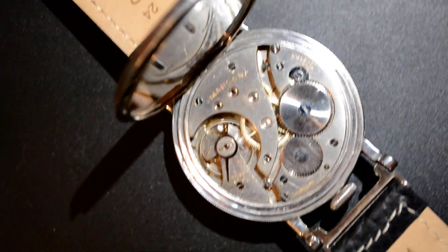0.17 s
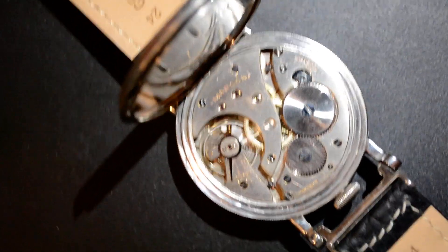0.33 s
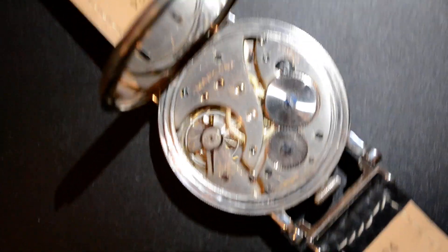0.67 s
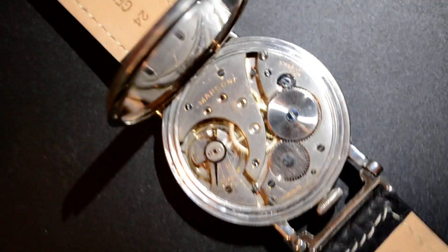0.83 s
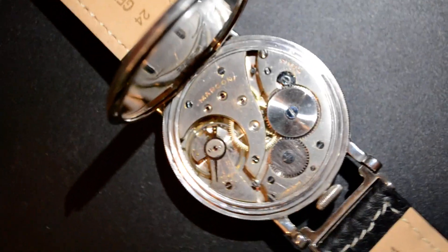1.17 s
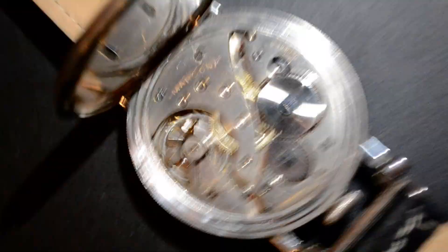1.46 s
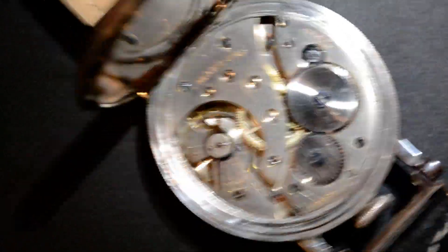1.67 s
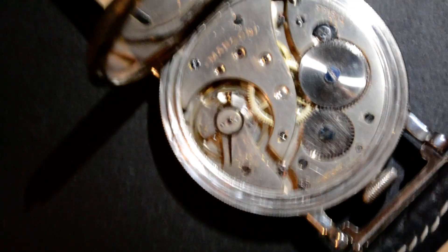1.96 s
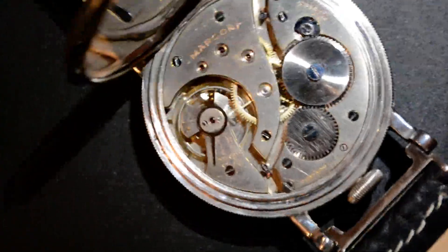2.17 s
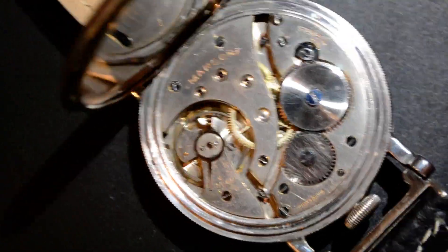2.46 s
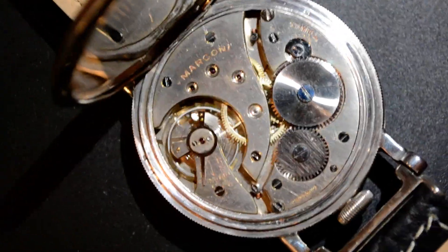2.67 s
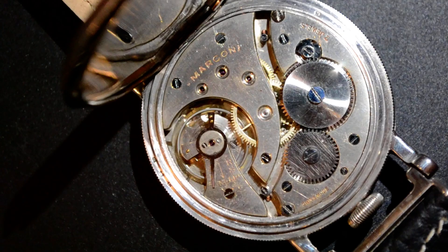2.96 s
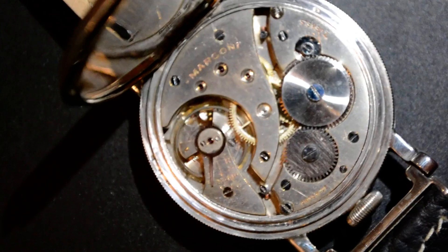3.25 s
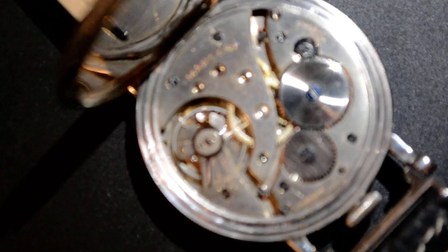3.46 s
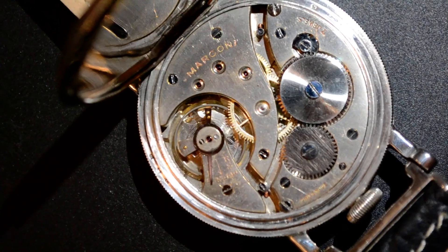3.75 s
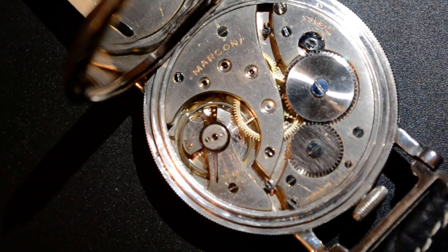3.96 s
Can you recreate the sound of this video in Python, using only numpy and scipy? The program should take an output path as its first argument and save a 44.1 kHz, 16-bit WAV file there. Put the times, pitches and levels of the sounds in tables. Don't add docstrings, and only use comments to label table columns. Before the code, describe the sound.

Quiet room, low hiss. A small open watch movement ticks five times a second, thin and distant. Right at the microphone, a camera's plastic body creaks and taps under fingers, a button clicks sharply, then the zoom barrel rubs briefly and smacks its stop, the loudest moment. Small knocks follow; later a softer click starts four short whirring, squeaky focus motor runs.

```python
import sys
import numpy as np
from scipy import signal
from scipy.fft import rfft, irfft, next_fast_len
from scipy.io import wavfile

SR = 44100
rng = np.random.default_rng(int(sys.argv[2]) if len(sys.argv) > 2 else 0)


def unload_wav(signal):
    wavfile.write(
        sys.argv[1],
        SR,
        np.round(np.clip(np.atleast_2d(signal).T, -1, 1) * 32767).astype(np.int16),
    )


def gain_from_decibels(decibels):
    exponent = np.asarray(decibels, float) / 20
    return 10 ** exponent


N = 180829

# (time [s], level [dB], lens cavity hum [dB])
NOISE_LEVELS = [(0, -64.5, -19), (.3, -66.5, -12), (.95, -65, -7), (1.3, -65.5, -17), (1.55, -60, -12),
                (1.75, -65, -7.5), (2.5, -66, -11), (3.0, -66, -15), (3.5, -65, -11), (4.1, -66.5, -7.5)]
# (frequency [Hz], density [dB per Hz])
NOISE_COLOUR = [(15, -57), (25, -17), (122, -11.5), (171, -0.5), (238, -3.5), (359, -3.5), (775, -4.5),
                (1330, -4.5), (1900, -10), (3010, -7.5), (3340, -13), (4310, -15), (4780, -18.5),
                (9540, -28), (11400, -32), (14800, -72), (22000, -120)]
# (frequency [Hz], width [Hz], level [dB])
NOISE_PEAKS = [(100.2, 16, -25.5), (188, 37, -20), (341, 38, -12.5), (1300, 130, -22), (3610, 49, -17),
               (4300, 140, -17), (5130, 31, -22.5)]
# (frequency [Hz], opens [s], shuts [s])
LENS_CAVITIES = [
    (3150, 0.0, .7),
    (2670, .45, 1.54),
    (2960, 1.54, 4.2),
]
# (frequency [Hz], level [dB rms])
APPLIANCE_LINES = [(100, -88), (174, -82.5), (199, -81)]
# (frequency [Hz], level [dB], t60 [s])
WATCH_PLATES = [(6100, -3, 0.015), (6630, 1, 0.011), (7050, 0.5, 0.017), (8500, -9, 0.014),
                (9000, -7, .012), (9700, -6, .02), (10960, -7, .009)]
WHEEL_DROPS = [-53, -52.5, -57, -50, -52, -56, -53.5, -55, -54, -59, -59, -53.5, -52.5, -54.5, -55, -59,
               -56, -56, -56, -56, -57.5]
# (time [s], peak [dB], thud under it [dB], sharp edge over it [dB], panel ring [Hz])
BODY_KNOCKS = [(0.2124, -60, -16, -7, 970), (.7165, -64, 2.5, -9, 850), (0.7312, -42.5, -29, -6.5, 3320),
               (0.8046, -59, 3, -14, 458), (0.8664, -60, -1.5, -16, 1280), (0.8879, -45.5, -6, -18.5, 2670),
               (0.9004, -43, -12.5, -21, 2520), (0.9083, -38, -11, -14, 2750), (1.3324, -50, 3, -22, 330),
               (1.3399, -37.5, -3.5, -27, 970), (1.3454, -42, -1.5, -27, 450), (1.503, -47, .1, -18, 473),
               (1.592, -49, -3.5, -21, 3200), (1.655, -54, -11, -18, 3300), (1.6854, -61, 7, -17, 1300),
               (1.7844, -55, -22, -14, 2890), (1.304, -70, 9, -11, 820), (1.869, -52, -9, -6, 3300),
               (1.8751, -40, -11, -9, 3300), (1.883, -52, -2.5, -18, 546), (2.0118, -54, -13.5, -22, 3050),
               (2.0428, -52.5, -6, -11.5, 689), (2.1044, -55, -8.5, -30, 396), (2.4734, -66, 4, -11, 630)]
FOCUS_REVERSALS = [
    (3.2237, -45, -10, -18, 4500),
    (3.5576, -37.5, -11, -21, 2570),
    (3.5653, -33.5, -11, -27, 2650),
]
# (time [s], peak [dB], sharp edge over it [dB], ring [Hz])
GEAR_SLACK = [(3.0508, -54.5, -4, 4000), (3.0572, -44, -19, 5070), (3.0628, -35, -13, 4970),
              (3.1773, -41, -16, 4440), (3.2148, -50, 2.5, 4860), (3.2293, -35, -5.5, 5180),
              (3.455, -36.5, -23, 2580), (3.5167, -38.5, -12.5, 4950), (3.5311, -40, -26, 2770),
              (3.5384, -45, -21, 4450), (3.6401, -53, -11, 4950), (3.6872, -35.5, -21, 4480),
              (3.7556, -48, -2.5, 4960), (3.7645, -40, -16, 3750), (3.7698, -32.5, -15, 4700),
              (3.8441, -41, -13, 4300)]
# (time [s], peak [dB])
LEVER_CLICKS = [
    (1.2085, -23.5),
    (2.9228, -34),
]
# (frequency [Hz], level [dB], t60 [s])
SHELL_MODES = [
    [(748, -12, 0.022), (1016, -14, 0.018), (1290, -4, 0.022), (1640, -17, 0.014), (1890, -21, 0.025),
     (2720, -3.5, 0.018), (2860, -3.5, 0.016), (4320, -17, 0.015), (5200, -19, .01), (6140, -14, 0.0063),
     (7200, -17, .007), (8700, -13, .005), (9500, -13.5, .005)],
    [(910, -15.5, 0.031), (1330, 1.5, 0.016), (1410, -10, 0.11), (1700, -3, 0.014), (2200, -3.5, 0.016),
     (2800, -13, .02), (3640, -15, 0.012), (4500, -14, 0.021), (5000, -11, 0.01), (7000, -24, .008)],
]
CLICK_CRACK = (.18, .12)
# (frequency [Hz], density [dB per Hz])
RUB_COLOUR = [(88, -53), (150, -30), (339, -10), (584, -18), (781, -11), (2000, -9), (2780, -4.5),
              (3520, -14), (5140, -15), (9190, -21), (11400, -38), (14800, -70), (22000, -120)]
# (frequency [Hz], width [Hz], level [dB])
RUB_PEAKS = [(1280, 300, -20), (2780, 200, -.3), (5130, 250, -15), (8400, 340, -14)]
# (time [s], peak [dB], contact hardness [Hz])
BARREL_HITS = [
    (1.5436, -16, 9000),
    (1.5437, -12, 8000),
    (1.5464, -13, 3000),
    (1.5527, -26, 2500),
]
# (frequency [Hz], level [dB], t60 [s])
BARREL_MODES = [(190, -14, 0.02), (256, -6, .025), (320, .7, 0.024), (433, -.5, 0.028), (507, -15, .02),
                (748, -3, 0.026), (967, -12.5, 0.039), (1120, -18, 0.035), (1264, -1.5, 0.055),
                (1500, -6.5, 0.02), (1880, -.3, 0.02), (2460, -5.5, 0.03), (2850, 6, 0.032),
                (3500, -8.5, 0.027), (4380, 3, 0.0095), (5290, -6.5, 0.018), (9440, -2, .01)]
# (time [s], level [dB], whine centre [Hz], gear mesh [Hz])
FOCUS_RUNS = [
    [(3.052, -68, 4700, 1500), (3.062, -52, 4940, 1500), (3.085, -49, 4500, 1450), (3.11, -49, 4050, 1030),
     (3.13, -50.5, 4870, 950), (3.18, -53.5, 4830, 960)],
    [(3.215, -45, 4940, 1300), (3.25, -45.5, 4630, 1410), (3.28, -51.5, 4300, 1540),
     (3.312, -52, 4380, 1890), (3.34, -50.5, 3970, 1390), (3.37, -49.5, 3900, 1210),
     (3.457, -50, 4070, 1290)],
    [(3.518, -52, 4900, 1300), (3.54, -47.5, 4640, 1330), (3.562, -56, 3700, 1300),
     (3.59, -49.5, 3900, 1420), (3.62, -48, 4700, 1420), (3.65, -54, 5200, 1460), (3.689, -52, 4900, 1450)],
    [(3.756, -49.5, 4830, 1300), (3.772, -43, 4300, 1334), (3.785, -52.5, 4950, 1320),
     (3.82, -52.5, 4770, 1400), (3.846, -50, 4500, 1400)],
]
# (frequency [Hz], density [dB per Hz])
MOTOR_SPECTRUM = [(290, -45), (500, -18), (855, -11), (1300, -13), (2060, -10.5), (2500, -6), (3170, -7),
                  (3800, 1), (6250, -14), (9890, -19.5), (11400, -54), (14800, -82), (22000, -120)]
# (frequency [Hz], width [Hz], level [dB])
HOUSING_PEAKS = [(1290, 140, -14), (4480, 230, 6.5), (4950, 68, -5), (5460, 340, -2.5), (5700, 100, -20),
                 (7760, 280, -28), (6790, 78, -20), (8450, 200, -17), (10000, 160, -32)]
# (ratio to whine centre, width [Hz], level [dB])
WHINES = [(.98, 350, 2.1), (1.12, 380, -1.5)]
# (multiple of mesh rate, level [dB])
MESH_SQUEAL = [(1, -10), (2, 1), (3, -4.5), (4, -35)]

FIRST_BEAT_S, BEAT_S, TOCK_EARLY_S = .0427, .2, .0051
PALLET_HZ, PALLET_T60_S = 8880, .012
TICK_UNLOCK_DB, TOCK_UNLOCK_DB, UNLOCK_SPREAD_DB, DROP_CRACK_DB = -79, -72, 1.5, -4
SHARP_T60_S, T60_S_PER_DULL_DB = .015, .0006
SLACK_THUD_DB = -23
SLIDE_START_S, SLIDE_STOP_S, SLIDE_DB = 1.335, 1.542, -46.5
SLIDE_ATTACK_S, SLIDE_FROM_DB, PRESS_S, PRESS_DB = .037, -20, .03, 3.1
LET_GO_DB, LET_GO_DB_PER_S = 4, 180
SETTLE_S, SETTLE_DB, SETTLE_DB_PER_S = 1.67, -60.5, 330
LOADED_HZ, SQUEAL_DB, SQUEAL_DB_PER_KHZ_FREE = 4350, -6.5, 26
QUIET_MESH_HZ, SQUEAL_DB_PER_KHZ_SLOW, SQUEAL_DB_PER_KHZ_FAST = 1200, 90, 13
IDLE_CAVITY_DB = -22
MIC_LOW_HZ, MIC_HIGH_HZ, CUTOFF_HZ = 44.7, 10400, 12600
PORT_NOTCH_HZ, PORT_NOTCH_WIDTH_HZ, PORT_NOTCH_DEPTH = 8000, 290, 0.39


def rms_one(x):
    return x / np.sqrt(np.mean(x ** 2) + 1e-20)


def peak_one(x):
    return x / (np.abs(x).max() + 1e-20)


def in_time(rows, start=0, size=N):
    s, *columns = np.transpose(rows)
    return [np.interp((start + np.arange(size)) / SR, s, c) for c in columns]


def add(out, s, x):
    at = round(s * SR)
    out[at:at + len(x)] += x[:N - at]


def band_pass(x, order, low_hz, high_hz):
    return signal.sosfilt(signal.butter(order, [low_hz, high_hz], "band", fs=SR, output="sos"), x)


def high_pass(x, hz):
    return signal.sosfilt(signal.butter(2, hz, "high", fs=SR, output="sos"), x)


def drift(rate, size):
    r = np.exp(-2 * np.pi * rate / SR)
    noise = rng.standard_normal(size + 8000)
    return rms_one(signal.lfilter([1], [1, -2 * r, r * r], noise)[8000:])


def coloured(x, spectrum):
    hz, db = np.transpose(spectrum)
    size = next_fast_len(len(x))
    grid = np.log(np.fft.rfftfreq(size, 1 / SR) + 1)
    gain = gain_from_decibels(np.interp(grid, np.log(hz), db))
    return rms_one(irfft(rfft(x, size) * gain, size)[:len(x)])


def resonance(x, hz, width_hz, state=None):
    r = np.exp(-np.pi * width_hz / SR)
    top = (1 - r * r) / 2 * np.array([1, 0, -1])
    return signal.lfilter(top, [1, -2 * r * np.cos(2 * np.pi * hz / SR), r * r], x, zi=state)


def resonances(x, peaks):
    return sum(gain_from_decibels(db) * rms_one(resonance(x, hz, width)) * (-1) ** k
               for k, (hz, width, db) in enumerate(peaks))


def gliding(x, hz, width_hz):
    out, state = np.zeros(len(x)), np.zeros(2)
    for i in range(0, len(x), 128):
        out[i:i + 128], state = resonance(x[i:i + 128], hz[i], width_hz, state)
    return rms_one(out)


def ring(x, hz, t60):
    r, w = gain_from_decibels(-60 / (max(t60, 1e-3) * SR)), 2 * np.pi * hz / SR
    return signal.lfilter([0, np.sin(w)], [1, -2 * r * np.cos(w), r * r], x)


def burst(t60, seconds=.12, rise_s=0.00053):
    t = np.arange(round(seconds * SR)) / SR
    decay = gain_from_decibels(-60 * t / max(t60, 1e-3))
    return rng.standard_normal(len(t)) * decay * (1 - np.exp(-t / max(rise_s, 1e-5)))


def grains(size, per_s, spread_db):
    sizes = gain_from_decibels(spread_db * np.minimum(rng.exponential(1, size), 5)) * rng.choice([-1, 1], size)
    return sizes * (rng.random(size) < per_s / SR) + 1e-9


def hiss():
    level_db, hum_db = in_time(NOISE_LEVELS)
    t = np.arange(N) / SR
    sound = coloured(rng.standard_normal(N), NOISE_COLOUR) * gain_from_decibels(0.23 * drift(3, N))
    for peak in NOISE_PEAKS:
        sound += resonances(rng.standard_normal(N), [peak]) * gain_from_decibels(1.1 * drift(6.5, N))
    for hz, opens, shuts in LENS_CAVITIES:
        cavity = rms_one(resonance(rng.standard_normal(N), hz, 70))
        cavity_db = np.where((t >= opens) & (t < shuts), hum_db, IDLE_CAVITY_DB)
        sound += cavity * gain_from_decibels(cavity_db + 2 * drift(24.9, N))
    return sound * gain_from_decibels(level_db - 1.12)


def hum():
    t = np.arange(N) / SR
    out = np.zeros(N)
    for hz, db in APPLIANCE_LINES:
        level = np.sqrt(2) * gain_from_decibels(db + 2.0 * drift(2.8, N))
        out += level * np.sin(2 * np.pi * hz * t + .8 * drift(1.2, N))
    return out


def watch():
    out = np.zeros(N)
    for k, drop_db in enumerate(WHEEL_DROPS):
        tock = k % 2
        s = FIRST_BEAT_S + k * BEAT_S - tock * TOCK_EARLY_S
        drop = sum(gain_from_decibels(db + rng.normal(0, 2.5)) * ring(burst(0.0037), hz, t60)
                   for hz, db, t60 in WATCH_PLATES)
        crack = band_pass(burst(0.009), 2, 5200, 11500)
        beat = peak_one(drop) + gain_from_decibels(DROP_CRACK_DB) * peak_one(crack)
        add(out, s, gain_from_decibels(drop_db - 3.1) * peak_one(beat))
        unlock_db = TOCK_UNLOCK_DB if tock else TICK_UNLOCK_DB
        for lead_s, ping_db in ((.02, 0.1), (.013, -2.5), (.008, -4.0)):
            ping = peak_one(ring(burst(0.0033), PALLET_HZ, PALLET_T60_S))
            level_db = unlock_db + rng.normal(0, UNLOCK_SPREAD_DB) + ping_db
            add(out, s - lead_s, gain_from_decibels(level_db) * ping)
    return out


def knocks(table, ring_db, ring_share):
    out = np.zeros(N)
    for s, peak_db, thud_db, edge_db, hz in table:
        t60 = SHARP_T60_S - T60_S_PER_DULL_DB * edge_db
        bands = ((300, 1600, thud_db + 6.5, 1.1), (1600, 5500, -.3, .7), (5500, 11000, edge_db + 6, .45))
        for low, high, db, lasting in bands:
            band = band_pass(burst(t60 * lasting, rise_s=0.48 / low), 3, low, high)
            if low <= hz < high:
                panel = ring(burst(t60 * 0.49), hz, t60 * ring_share)
                band = peak_one(band) + gain_from_decibels(ring_db) * peak_one(panel)
            add(out, s, gain_from_decibels(peak_db + db) * peak_one(band))
    return out


def buttons():
    out = np.zeros(N)
    for (s, peak_db), modes, crack_share in zip(LEVER_CLICKS, SHELL_MODES, CLICK_CRACK):
        shell = sum(gain_from_decibels(db) * peak_one(ring(burst(0.0031, .15), hz, t60)) for hz, db, t60 in modes)
        crack = band_pass(burst(0.0055, .15), 2, 900, 9000)
        snap = high_pass(peak_one(shell) + crack_share * peak_one(crack), 500)
        add(out, s, gain_from_decibels(peak_db) * peak_one(snap))
    return out


def zoom_slide():
    size = round(.45 * SR)
    i = np.arange(size)
    t = SLIDE_START_S + i / SR
    rub = grains(size, per_s=6000, spread_db=1.5) * gain_from_decibels(1.3 * drift(44, size))
    sound = rms_one(coloured(rub, RUB_COLOUR) + resonances(rub, RUB_PEAKS))
    fade = np.clip(np.minimum(i / 150, (size - i) / 1500), 0, 1)
    times = [SLIDE_START_S, SLIDE_START_S + SLIDE_ATTACK_S, SLIDE_STOP_S - PRESS_S, SLIDE_STOP_S]
    moving_db = np.interp(t, times, [SLIDE_FROM_DB, 0, 0, PRESS_DB])
    let_go_db = -LET_GO_DB - LET_GO_DB_PER_S * (t - SLIDE_STOP_S)
    level_db = SLIDE_DB + np.where(t < SLIDE_STOP_S, moving_db, let_go_db)
    settle_db = SETTLE_DB - SETTLE_DB_PER_S * np.abs(t - SETTLE_S)
    out = np.zeros(N)
    add(out, SLIDE_START_S, sound * fade * gain_from_decibels(np.maximum(level_db, settle_db)))
    return out


def barrel_stop():
    out = np.zeros(N)
    for s, peak_db, hard_hz in BARREL_HITS:
        modes = sum(gain_from_decibels(db) * peak_one(ring(burst(0.0051, .2), hz, t60)) for hz, db, t60 in BARREL_MODES)
        crack = band_pass(burst(0.01, .2), 2, 700, 6000)
        hit = peak_one(modes) + 0.9 * peak_one(crack)
        hit = signal.lfilter(*signal.butter(1, hard_hz, fs=SR), hit)
        add(out, s, gain_from_decibels(peak_db) * peak_one(high_pass(hit, 170)))
    return out


def focus_motor():
    out = np.zeros(N)
    for run in FOCUS_RUNS:
        start, size = round(run[0][0] * SR), round((run[-1][0] - run[0][0]) * SR)
        i = np.arange(size)
        level_db, whine_hz, mesh_hz = in_time(run, start, size)
        free_khz = np.maximum(whine_hz - LOADED_HZ, 0) / 1000
        slow_khz = np.maximum(QUIET_MESH_HZ - mesh_hz, 0) / 1000
        squeal_db = SQUEAL_DB - SQUEAL_DB_PER_KHZ_FREE * free_khz - SQUEAL_DB_PER_KHZ_SLOW * slow_khz
        squeal_db += SQUEAL_DB_PER_KHZ_FAST * (mesh_hz - QUIET_MESH_HZ) / 1000
        motor_steps = 1 + 0.079 * np.sin(2 * np.pi * 200 * i / SR)
        rattle = grains(size, per_s=12000, spread_db=1.9) * motor_steps * gain_from_decibels(0.91 * drift(55, size))
        sound = gain_from_decibels(-1.5) * coloured(rattle, MOTOR_SPECTRUM) + resonances(rattle, HOUSING_PEAKS)
        for ratio, width_hz, db in WHINES:
            sound += gain_from_decibels(db) * gliding(rattle, ratio * whine_hz, width_hz)
        squeal = np.zeros(size)
        for k, db in MESH_SQUEAL:
            unsteady_hz = k * mesh_hz * (1 + 0.0099 * drift(40, size))
            squeal += gain_from_decibels(db) * gliding(rattle, unsteady_hz, 40 * k)
        sound = rms_one(sound) + gain_from_decibels(squeal_db - 4.5 + 3.5 * drift(30, size)) * squeal
        fade = np.clip((size - i) / 90, 0, 1)
        add(out, run[0][0], sound * gain_from_decibels(level_db - 1.97) * fade)
    return out


def scene():
    slack = [(s, db, SLACK_THUD_DB, edge_db, hz) for s, db, edge_db, hz in GEAR_SLACK]
    body = knocks(BODY_KNOCKS + FOCUS_REVERSALS, ring_db=2.5, ring_share=0.62)
    body += knocks(slack, ring_db=-4.0, ring_share=0.66)
    body = high_pass(body + buttons(), 220)
    return (hiss() + hum() + watch() + body + zoom_slide() + barrel_stop() + focus_motor())[None]


def low_pass(x):
    return signal.sosfilt(signal.butter(12, 11570, fs=SR, output="sos"), x)


def record(dry):
    thin = band_pass(dry, 2, MIC_LOW_HZ, MIC_HIGH_HZ)
    port = thin - PORT_NOTCH_DEPTH * resonance(thin, PORT_NOTCH_HZ, PORT_NOTCH_WIDTH_HZ)
    mix = signal.sosfilt(signal.cheby2(6, 35, CUTOFF_HZ, fs=SR, output="sos"), port)
    return low_pass(mix)


dry = scene()
out = record(dry)
unload_wav(out)
```